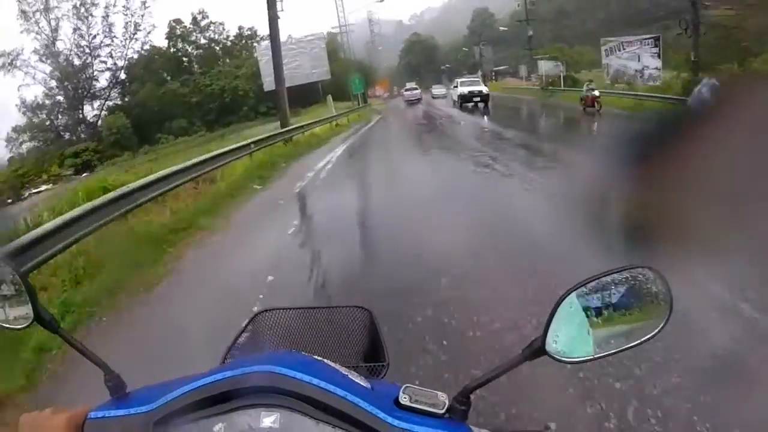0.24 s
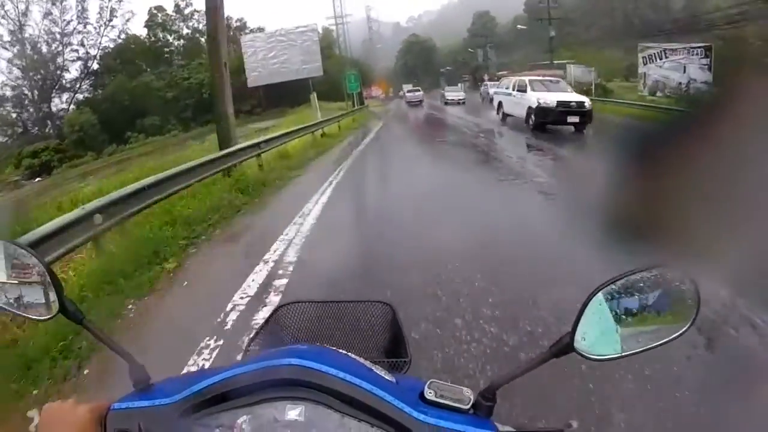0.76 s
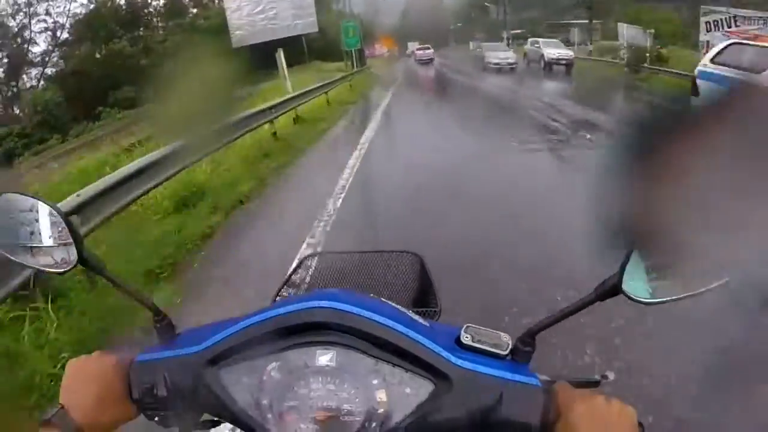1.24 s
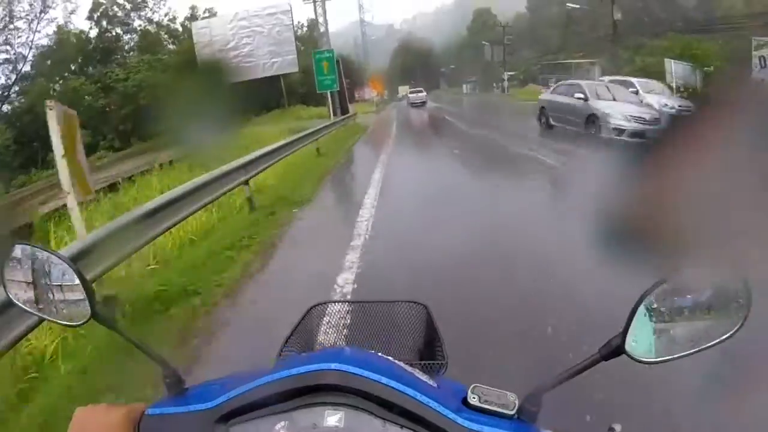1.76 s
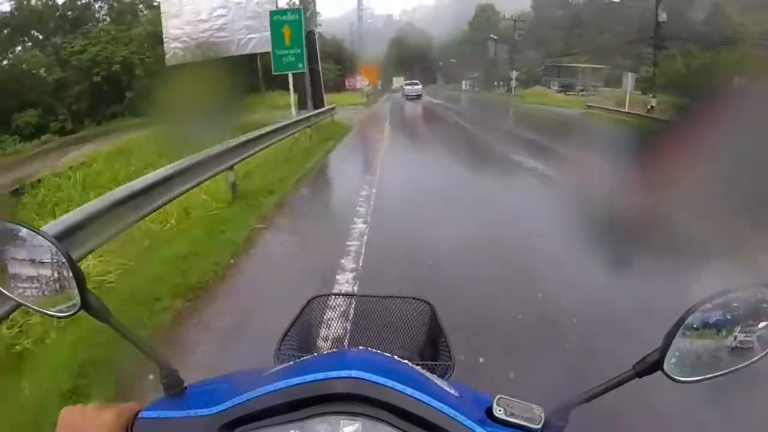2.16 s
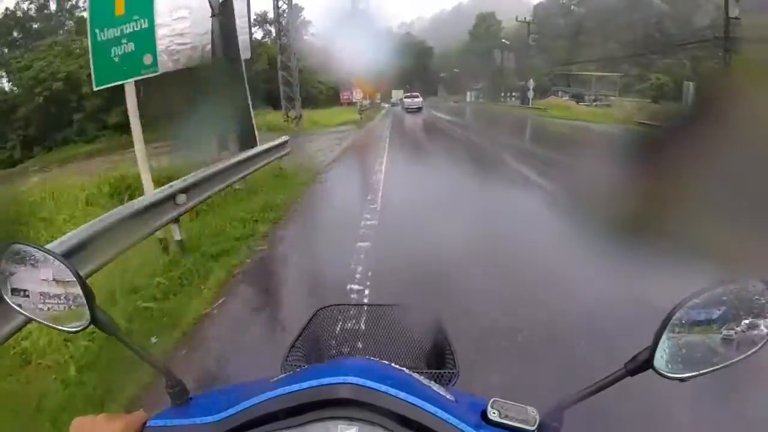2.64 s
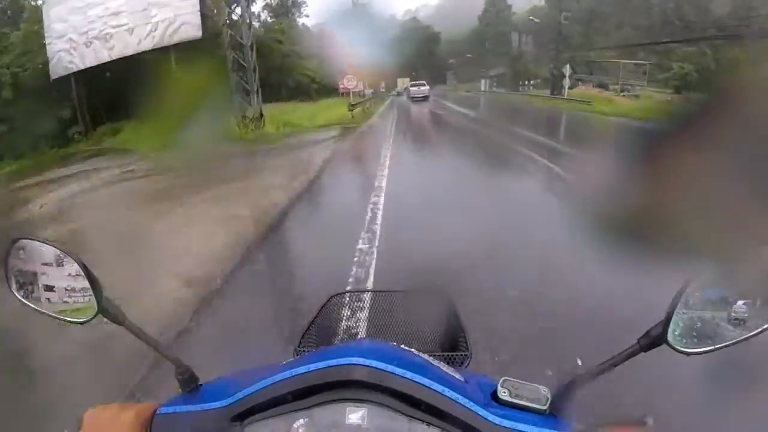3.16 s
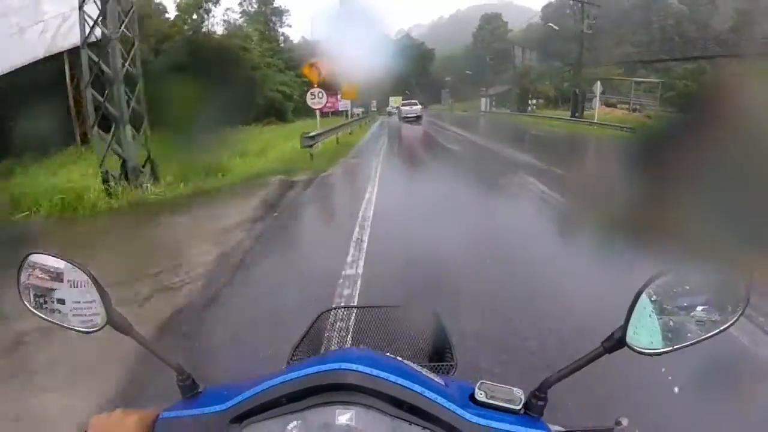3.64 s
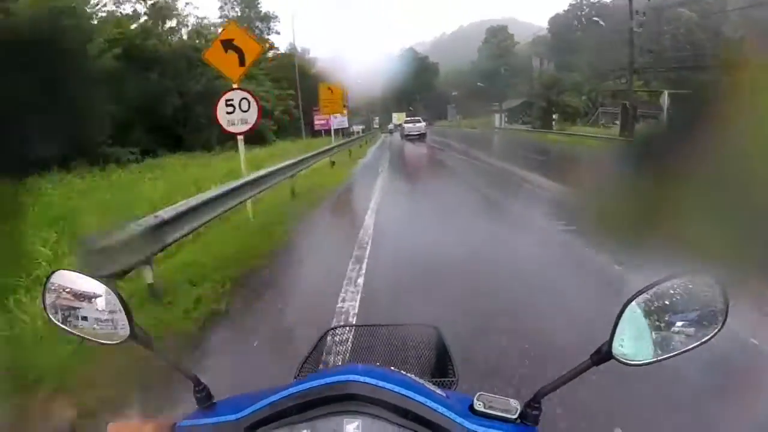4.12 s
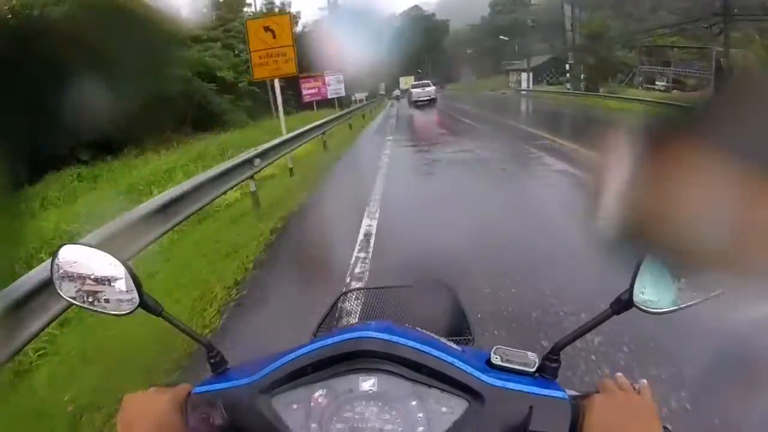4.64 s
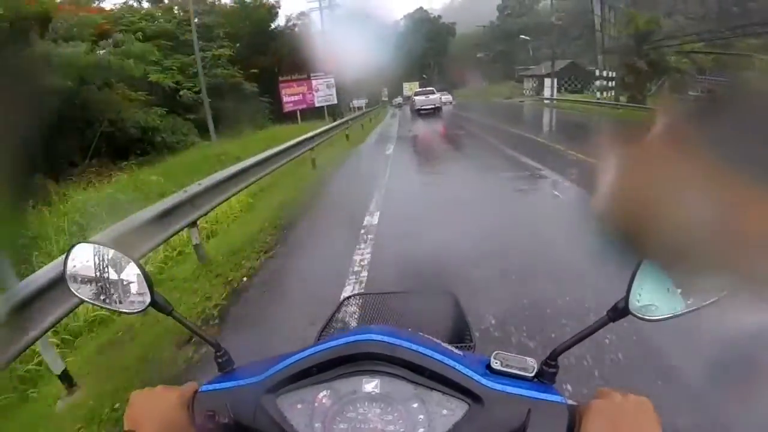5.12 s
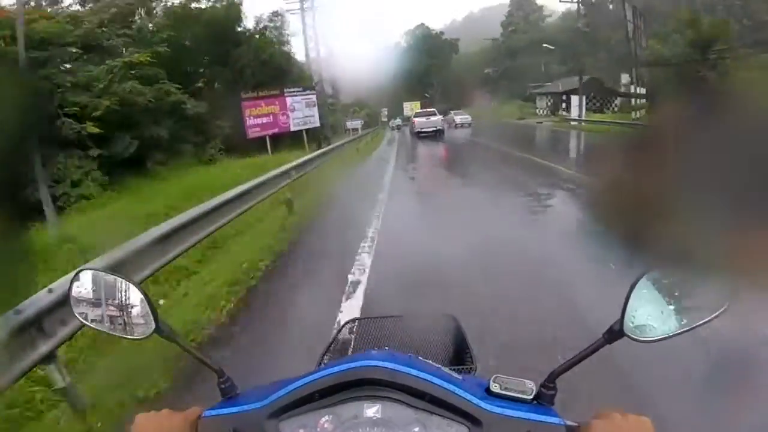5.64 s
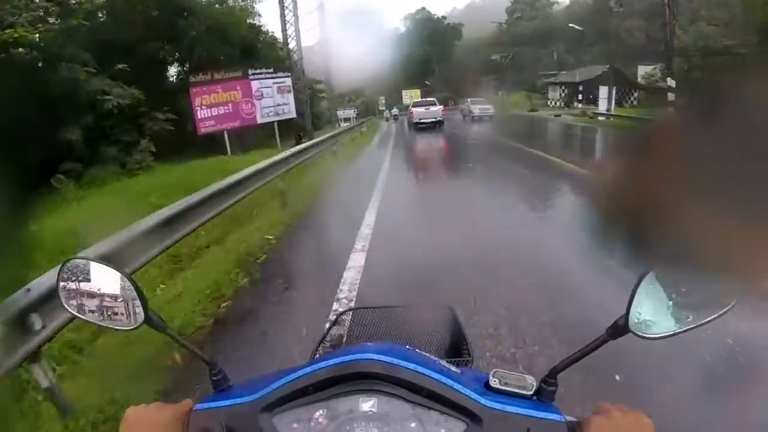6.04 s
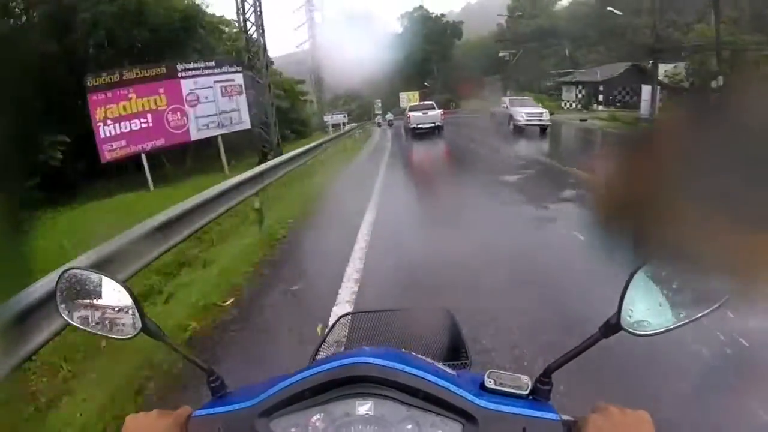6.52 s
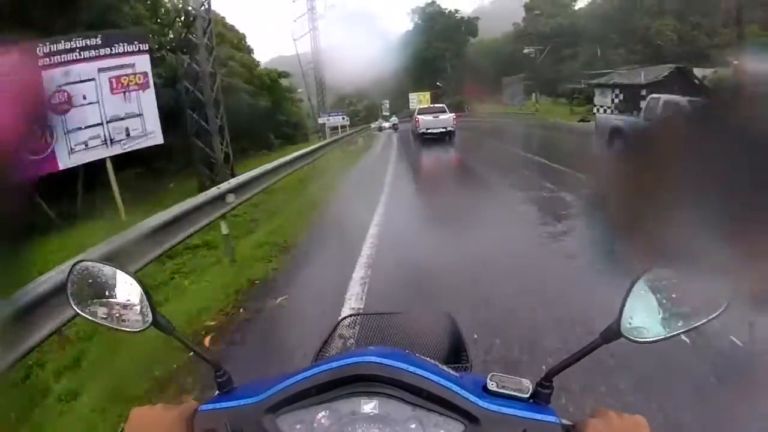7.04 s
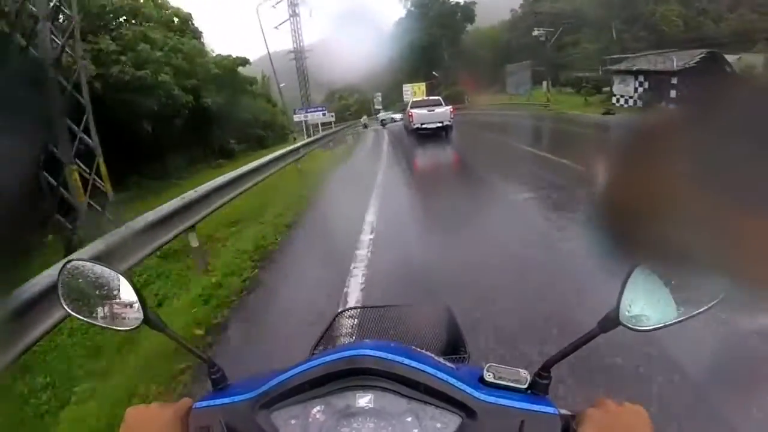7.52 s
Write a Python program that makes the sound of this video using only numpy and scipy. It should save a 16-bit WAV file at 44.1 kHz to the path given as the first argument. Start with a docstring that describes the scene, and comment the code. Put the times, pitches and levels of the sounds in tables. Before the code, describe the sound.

A microphone in a housing on a scooter rider, outdoors on a rainy road; both channels identical, top end dulled. From 0 s the single-cylinder engine pulls with a dense low throb and intake honk, rising slightly, over wind rumble, airy rush and wet tyre hiss. A soft drop thuds at 0.1 s. Oncoming vehicles swish by around 0.7, 1.15, 1.65 and 2.05 s. A low drone booms at 2.1-2.8 s, swelling twice and sinking, as the engine changes up and pulls more gently. At 3.07 s a huge drop cracks; everything ducks, recovering over a second or more. Small ticks follow. About 4-4.25 s the throttle closes and the engine coasts, its throb slowing to the end. Rain patter, brighter shell hits and short thumping gusts continue. Another strong crack at 5.96 s ducks the sound, with a lesser click at 6.5 s. A car hisses past at 7.1 s; the hardest splattering crack at 7.45 s leaves the ending very subdued.

```python
"""A single-cylinder scooter pulls, changes up and coasts on a wet road, heard from a housing on the rider.
Its engine is a stack of harmonics that shift with the throttle; a low drone booms once beside it.
Big drops crack on the microphone port: a limiter ducks just ahead of the hardest and recovers slowly.
Wind is filtered noise with single gusts; rain, wet tyres and oncoming cars are coloured noise and ticks."""
import sys
import numpy as np
from scipy import signal
from scipy.fft import rfft, irfft
from scipy.io import wavfile
from scipy.ndimage import uniform_filter1d

SR = 44100
rng = np.random.default_rng(int(sys.argv[2]) if len(sys.argv) > 2 else 0)


def digitize_waveform(pressure):
    """Quantize a signal to 16-bit integers and store it at the path in sys.argv[1].

    Rows of a 2-D input are taken as channels; values are limited to [-1, 1].
    """
    field = np.atleast_2d(pressure).T
    bounded = np.clip(field, -1, 1)
    quanta = np.round(bounded * 32767).astype(np.int16)
    wavfile.write(sys.argv[1], SR, quanta)


N = 343098
TIME = np.arange(N) / SR  # s

# The engine pulls, changes up, pulls more gently and coasts:
# [t/s, four-stroke cycle rate f/Hz, throttle 0-1, level/dB]
ENGINE_RIDE = [(0, 32.2, 0.74, 3), (.5, 36.3, 0.88, 0.5), (1, 35.3, 0.8, 1.5), (2.1, 38.8, 1, -1),
               (2.35, 38.8, 0.63, -5.5), (2.7, 32.2, 0.8, -2), (3.5, 35.7, 0.88, -4), (3.95, 34, 0.9, 1.5),
               (4.25, 33.9, 0, -1), (5, 31.3, 0, -0.5), (6, 28.7, 0, -0.5), (7, 26.8, 0.07, -1),
               (7.78, 23.2, 0.08, -2.5)]
# Exhaust harmonics, one row per multiple of the cycle rate, before the ride level:
# [level pulling/dB, level coasting/dB]
EXHAUST_HARMONICS = [(-33, -54), (-28.5, -34), (-40, -30), (-33.5, -28.5), (-40.5, -42), (-51, -35),
                     (-41.5, -39), (-45, -42.5), (-40.5, -51), (-40, -54.5), (-49.5, -64.5), (-45.5, -52.5)]
# Low boom just after the first oncoming cars have gone by: [t/s, f/Hz, level/dB]
BOOM_GLIDE = [(2.0, 100.6, -42), (2.1, 98.5, -24.5), (2.2, 100.3, -16.5), (2.32, 96.9, -14.5),
              (2.42, 93.9, -17.5), (2.57, 89.7, -22.5), (2.66, 87.65, -17), (2.8, 85.5, -47)]
# Big drops on the microphone port, before the limiter:
# [t/s, peak level/dB, air push re crack, splatter re crack, brightness f/Hz]
PORT_DROPS = [(0.1024, -10, .5, 0.088, 1000), (3.0724, 18, 0.29, .15, 5000), (3.473, -18, .05, .15, 8000),
              (3.848, -32, .1, .2, 6000), (4.344, -20, 0.044, .2, 7010), (4.896, -23, .05, .2, 8100),
              (5.064, -22, .05, .15, 5984), (5.544, -19.5, .1, .3, 5000), (5.958, 10, .4, 0.053, 11000),
              (6.5241, -6, 0.1597, .01, 14000), (7.4472, 24, 0.5, 0.29, 4300)]
# Relative strength of the headwind on the housing: [t/s, level/dB]
HEADWIND = [(0, 1.5), (.8, 0.5), (1.25, 0.5), (1.75, -2), (2.15, 1), (3.05, 0), (3.5, -3), (3.8, 1),
            (4.25, 3), (4.8, -1.5), (4.95, 4), (5.55, 2.5), (5.85, -7.5), (6.4, -1), (6.7, -9.5),
            (7.78, -1)]
# Single gusts, rise before it is shared between thump and rush: [t/s, half-length/s, rise level/dB]
WIND_GUSTS = [(0.01, 0.006, 13.5), (.279, 0.021, 9.5), (.786, 0.01, 10.5), (1.177, 0.008, 12),
              (1.292, 0.032, 0), (1.588, .01, 9), (2.697, 0.026, 5), (2.814, .012, 11), (2.993, 0.017, 8.5),
              (3.715, 0.026, 7), (3.777, 0.012, 11), (4.956, 0.023, 1.5), (5.146, 0.011, 5),
              (5.307, 0.0077, 4), (5.407, 0.0081, 6), (5.576, 0.016, 7), (5.65, 0.014, 8.5),
              (6.087, 0.015, 8.5), (6.335, 0.0072, 9), (6.352, .008, 11.5), (6.378, 0.013, 14.5),
              (6.44, 0.0066, 5), (7.126, 0.023, 11), (7.601, 0.021, 6)]
# Oncoming vehicles: [t/s when closest, spray level/dB, tread roar level/dB, lane distance over closing speed/s]
ONCOMING = [(.68, -34.5, -34.5, .2), (1.15, -29.5, -34.5, 0.18), (1.65, -33, -36.5, 0.14),
            (2.05, -31, -30.5, 0.24), (7.13, -33, -47, 0.17)]
# How wet it is: [t/s, patter on housing level/dB, direct shell hits level/dB, own tyre spray level/dB]
WETNESS = [(0, -40, -60.5, -37), (2.3, -42, -47, -37.5), (2.9, -41, -60, -36), (3.2, -36.5, -47, -52),
           (3.8, -35.5, -46.5, -48), (4.3, -37.5, -43, -42), (4.8, -36.5, -39.5, -40.5),
           (5.55, -36.5, -42, -40.5), (5.7, -39, -43, -43), (6.9, -38.5, -46.5, -47),
           (7.5, -33, -54, -45.5), (7.78, -39, -46, -59)]
# Water flung against the housing, a short flurry in the patter: [t/s, rise level/dB]
WATER_SPLASHES = [(1.687, 8), (2.844, 7.5), (3.953, 5), (4.415, 6), (5.547, 4), (5.912, 6)]

# Colour of the housing with its ringing port: [f/Hz, level/dB]
HOUSING_COLOUR = [(1400, -3), (2500, 4), (3350, 9.5), (3650, 3), (3950, -7), (4400, -3.5), (5100, 5),
                  (5900, 2), (6250, 6.5), (6500, 14.5), (6850, 5), (7600, -2), (9100, -2.5), (9800, -24)]
# Low part of the wind, relative density: [f/Hz, level/dB per Hz]
RUMBLE_SPECTRUM = [(10, -11), (22, -5.5), (32, -5), (42, -5.5), (70, -2.5), (110, -3.5), (170, -8),
                   (240, -12.5), (400, -28), (900, -66.5)]
# Airy part of the wind, relative density: [f/Hz, level/dB per Hz]
RUSH_SPECTRUM = [(90, -26), (260, 1.5), (400, -2.5), (600, -5), (1000, -17), (1600, -21), (3000, -44),
                 (8000, -66)]
# Tyre spray ahead of the housing colour, relative density: [f/Hz, level/dB per Hz]
SPRAY_SPECTRUM = [(300, -10.5), (600, 4), (1100, 2.5), (1700, -5), (3300, -7), (5000, -8), (6500, -0.5),
                  (8500, 5), (9800, -8.5)]
# Tread roar of an oncoming vehicle, relative density: [f/Hz, level/dB per Hz]
ROAR_SPECTRUM = [(150, -7), (400, 2), (800, -1), (1400, -6.5), (2500, -7), (5000, -44)]
# Drops on the shell, relative density: [f/Hz, level/dB per Hz]
SHELL_SPECTRUM = [(800, -7), (3000, -9), (4100, -5), (5200, -3.5), (6500, 7.5), (7500, 1), (9700, -5.5)]
# Rain patter ahead of the housing colour, relative density: [f/Hz, level/dB per Hz]
PATTER_SPECTRUM = [(200, -3.5), (700, 0), (1150, 6.5), (1600, 2), (3300, -6.5), (5000, -7), (7000, -14),
                   (9500, 3.5)]

EDDY_S = 0.011  # longer gusts mostly thump, shorter ones mostly rush
EDGE_HZ = 9950  # upper band limit
CEILING, RECOVERY_S = .68, 1.23  # limiter peak amplitude and recovery time
BLOCK_S, BLOCK_LEAD_S = .032, .0275  # limiter block length, and offset of the block grid


def gain_of(db):
    """Decibels to amplitude."""
    return 10 ** (np.asarray(db) / 20)


def evened(x):
    """Scales to rms 1."""
    return x / np.sqrt(np.mean(x ** 2) + 1e-20)


def curves(rows):
    """Each column of a table, joined by straight lines in time."""
    s, *columns = np.transpose(rows)
    return [np.interp(TIME, s, column) for column in columns]


def colour(x, points, order=8192):
    """Causal minimum-phase filter with the given spectrum."""
    hz, db = np.transpose(points)
    at_hz = np.abs(np.fft.fftfreq(order, 1 / SR))
    log_gain = np.log(gain_of(np.interp(np.log(at_hz + 1), np.log(hz), db)))
    response = np.exp(np.conj(signal.hilbert(log_gain)))
    taps = np.fft.ifft(response).real[:order // 2]
    return signal.oaconvolve(x, taps)[:len(x)]


def drift(rate_hz):
    """Smooth random wander of rms 1, mostly slower than the given rate."""
    hz = np.fft.rfftfreq(N // 64, 64 / SR)
    spectrum = rfft(rng.standard_normal(N // 64)) / np.sqrt(1 + (hz / rate_hz) ** 4)
    slow = irfft(spectrum)
    return evened(np.interp(TIME, np.linspace(0, TIME[-1], len(slow)), slow))


def ticks(per_s, spread_db):
    """Random impacts of rms 1; a wider spread makes a few stand out."""
    sizes = gain_of(spread_db * np.minimum(rng.exponential(1, N), 6))
    signed = sizes * rng.choice([-1, 1], N)
    return evened(signed * (rng.random(N) < per_s / SR))


def nearness(s, near_s):
    """Power of a passing vehicle, 1 when closest: it falls with distance squared."""
    return 1 / (1 + ((TIME - s) / near_s) ** 2)


def engine(buzz_db=-50, buzz_fall_db=-9, pipe_hz=101, pipe_width_hz=10, pipe_db=7,
           intake_hz=345, intake_width_hz=16, intake_db=6, count=44):
    """A single cylinder: one exhaust pulse a cycle, whose harmonics shift with the throttle."""
    wobble, uneven_db, waver, smear = .0015, .8, .12, .35  # pitch, level, harmonic size, phase
    hz, throttle, level_db = curves(ENGINE_RIDE)
    throttle = np.clip(throttle, 0, 1)
    angle = 2 * np.pi * np.cumsum(hz * (1 + wobble * drift(4.25))) / SR
    tone = np.zeros(N)
    for k, (pull_db, coast_db) in enumerate(EXHAUST_HARMONICS, 1):
        # on the throttle the air intake resonates, off it the silencer does
        honk_db = throttle * intake_db / (1 + ((k * hz - intake_hz) / intake_width_hz) ** 2)
        drone_db = pipe_db / (1 + ((k * hz - pipe_hz) / pipe_width_hz) ** 2)
        pulling = throttle * gain_of(pull_db + honk_db)
        coasting = (1 - throttle) * gain_of(coast_db + drone_db)
        # the pipe smears each pulse; moving air makes it waver
        size = (pulling + coasting) * (1 + waver * drift(1.9))
        tone += size * np.cos(k * angle - smear * k ** 2)
    # a faint mechanical buzz, falling with each octave
    top = len(EXHAUST_HARMONICS)
    for k in range(top + 1, count):
        size = gain_of(buzz_db + buzz_fall_db * np.log2(k / top))
        tone += size * np.cos(k * angle + 2 * np.pi * rng.random())
    return np.sqrt(2) * tone * gain_of(level_db + uneven_db * drift(9))


def boom(second_db=-16, third_db=-20.0, waver_db=1.5):
    """A near-pure drone with two weak overtones, swelling twice as its pitch sinks."""
    hz, level_db = curves(BOOM_GLIDE)
    angle = 2 * np.pi * np.cumsum(hz) / SR
    tone = np.sin(angle)
    tone += gain_of(second_db) * np.sin(2 * angle)
    tone += gain_of(third_db) * np.sin(3 * angle)
    sounding = (TIME > BOOM_GLIDE[0][0]) & (TIME < BOOM_GLIDE[-1][0])
    return np.sqrt(2) * tone * sounding * gain_of(level_db + waver_db * drift(13))


def big_drops(undershoot_hz=65, splatter_s=0.00072, push_s=0.00011, splatter_push_s=0.0018,
              damping_db=23, overload=0.75, size=2048):
    """Each drop cracks, splatters and pushes air into the port, which rings; every hit ends in a brief low
    undershoot."""
    out, t = np.zeros(N), (np.arange(size) - size // 8) / SR
    edge = signal.firwin(63, EDGE_HZ, fs=SR)
    undershoot = signal.butter(2, undershoot_hz, "highpass", fs=SR)
    for s, peak_db, push, splatter, bright_hz in PORT_DROPS:
        splash = rng.standard_normal(size) * np.exp(-(t / splatter_s) ** 2)
        crack = (t == 0) + splatter * splash
        # a fat drop lands more softly, and its water damps the port
        softness = signal.butter(1, min(bright_hz, SR / 2 - 1), fs=SR)
        crack = signal.lfilter(*softness, crack)
        ringing = 1 / (1 + gain_of(peak_db - damping_db))
        ring = colour(crack, [(hz, db * ringing) for hz, db in HOUSING_COLOUR])
        # a splattering drop pushes for longer
        air_push = push * np.exp(-(t / (push_s + splatter * splatter_push_s)) ** 2)
        blow = ring / abs(ring).max() + air_push
        blow = np.convolve(np.tanh(overload * blow), edge, "same")  # the diaphragm rounds off the peak
        blow = signal.lfilter(*undershoot, blow)
        start = round(s * SR) - size // 8
        out[start:start + size] += gain_of(peak_db) * blow / abs(blow).max()
    return out


def wind(rumble_db=-25, rush_db=-34, rush_follows=0.44, rumble_flutter_db=2.5, rush_flutter_db=2.24,
         swell_db=2.54, gust_thump=1.0, gust_rush=1.35, swing_db=-16, swing_share=0.17):
    """Eddies break on the housing, thumping and rushing at once; the big ones swing the pressure."""
    strength_db, = curves(HEADWIND)
    eddies = drift(39)
    thump_db = rumble_db + strength_db + swell_db * drift(6.5)
    whoosh_db = rush_db + rush_follows * strength_db
    swings = np.zeros(N)
    for s, half_s, rise_db in WIND_GUSTS:
        gust_db = rise_db * np.exp(-((TIME - s) / half_s) ** 2)
        large = half_s / (half_s + EDDY_S)
        thump_db = thump_db + gust_thump * large * gust_db
        whoosh_db = whoosh_db + gust_rush * (1 - large) * gust_db
        core = (TIME - s) / (swing_share * half_s)
        swings -= large * gain_of(swing_db + rise_db) * 2 * core * np.exp(-core ** 2)  # up, then down
    rumble = colour(rng.standard_normal(N), RUMBLE_SPECTRUM)
    rumble = evened(rumble * gain_of(rumble_flutter_db * eddies))
    rush = colour(rng.standard_normal(N), RUSH_SPECTRUM)
    rush = evened(rush * gain_of(rush_flutter_db * eddies))
    return rumble * gain_of(thump_db) + rush * gain_of(whoosh_db) + swings * gain_of(strength_db)


def tyres(flutter_db=0.8, droplets_per_s=700, spread_db=0.0, droplets=0.49):
    """Tyres tear the water film into hiss and droplets: the scooter's all along, the others' as they pass."""
    _, _, own_db = curves(WETNESS)
    power = gain_of(own_db) ** 2
    for s, spray_db, _, near_s in ONCOMING:
        power = power + gain_of(spray_db) ** 2 * nearness(s, near_s)
    spray = rng.standard_normal(N) + droplets * ticks(droplets_per_s, spread_db)
    spray *= gain_of(flutter_db * drift(41))
    hiss = colour(colour(spray, SPRAY_SPECTRUM), HOUSING_COLOUR)
    return evened(hiss) * np.sqrt(power)


def tread_roar(ahead=0.94, behind=.6):
    """Oncoming treads roar close by, over a shorter stretch of road than their spray is heard."""
    power = np.zeros(N)
    for s, _, roar_db, near_s in ONCOMING:
        reach_s = near_s * np.where(TIME < s, ahead, behind)
        power += gain_of(roar_db) ** 2 * nearness(s, reach_s)
    return evened(colour(rng.standard_normal(N), ROAR_SPECTRUM)) * np.sqrt(power)


def spatter(splash_s=0.00084, per_s=130, spread_db=2.6):
    """Drops hit the shell directly: short bright noise bursts that stand out of the patter."""
    _, hits_db, _ = curves(WETNESS)
    decay = np.exp(-np.arange(64) / SR / splash_s)  # each splashes briefly
    power = np.convolve(ticks(per_s, spread_db) ** 2, decay)[:N]
    bursts = rng.standard_normal(N) * np.sqrt(np.abs(power))
    return evened(colour(bursts, SHELL_SPECTRUM)) * gain_of(hits_db)


def rain(per_s=3500, spread_db=1.5, wash=0.7, flurry_db=1.0, splash_s=.011):
    """Thousands of small drops tick on the housing in flurries, over a wash of far ones."""
    patter_db, _, _ = curves(WETNESS)
    splash_db = sum(db * np.exp(-((TIME - s) / splash_s) ** 2) for s, db in WATER_SPLASHES)
    drops = ticks(per_s, spread_db) + wash * rng.standard_normal(N)
    drops = drops * gain_of(flurry_db * drift(25))
    patter = colour(colour(drops, PATTER_SPECTRUM), HOUSING_COLOUR)
    return evened(patter) * gain_of(patter_db + splash_db)


def scene():
    """Everything enters by one port, so both channels are alike."""
    ride = engine() + boom() + big_drops() + wind()
    road = tyres() + tread_roar() + spatter() + rain()
    mono = ride + road
    return np.array([mono, mono])


def limiter_gain(x):
    """Looks one block ahead, drops at once to hold the peak at the ceiling, and creeps back up."""
    block = ((TIME + BLOCK_LEAD_S) / BLOCK_S).astype(int)
    starts = np.flatnonzero(np.diff(block, prepend=-1))
    peaks = np.maximum.reduceat(abs(x).max(0), starts)
    allowed = CEILING / np.maximum(peaks, np.append(peaks[1:], 0))
    gains = [1]
    for limit in allowed:
        recovered = gains[-1] + (1 - gains[-1]) * BLOCK_S / RECOVERY_S
        gains.append(min(limit, recovered))
    return uniform_filter1d(np.array(gains[1:])[block], size=48)  # softens the steps


def record(dry):
    """The limiter, then the band limit."""
    edge = signal.firwin(511, EDGE_HZ, window=("kaiser", 9), fs=SR)
    return signal.oaconvolve(dry * limiter_gain(dry), edge[None], "same", axes=1)


dry = scene()
out = record(dry)
digitize_waveform(out)
```